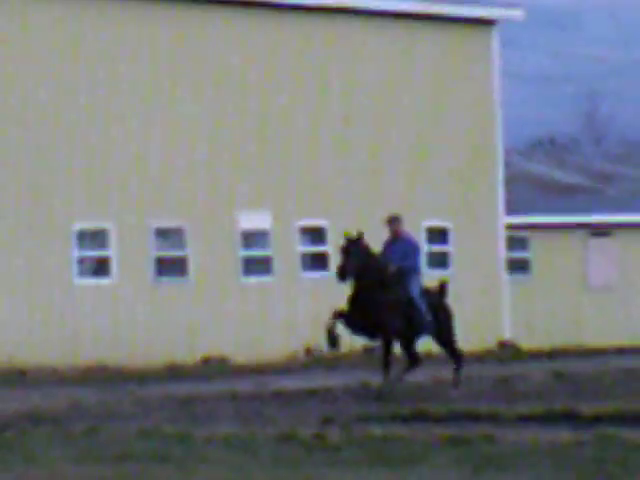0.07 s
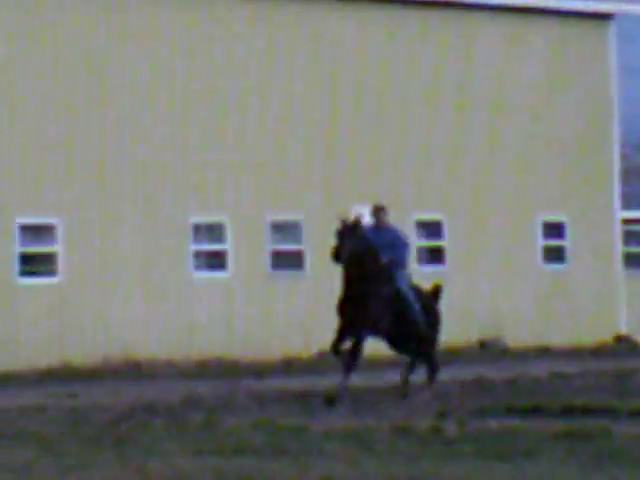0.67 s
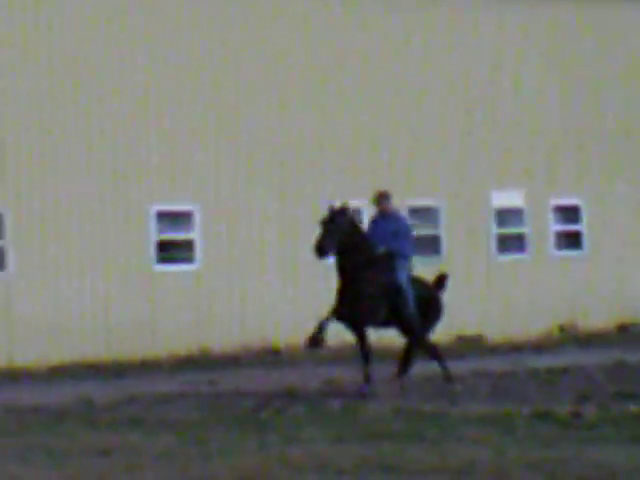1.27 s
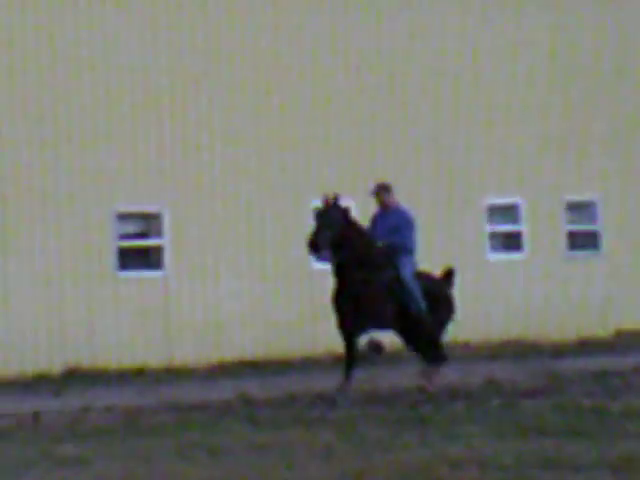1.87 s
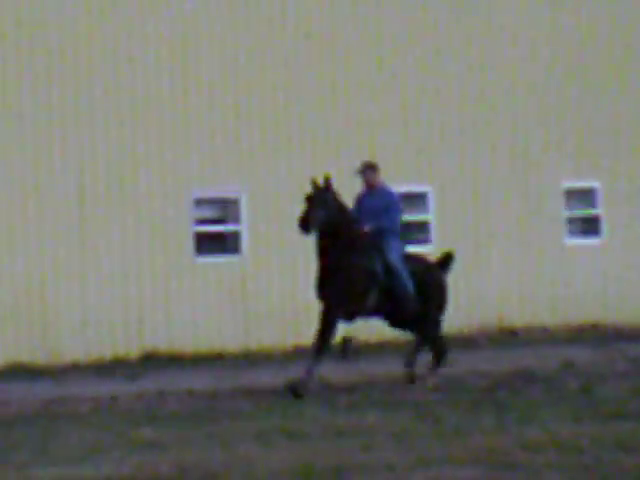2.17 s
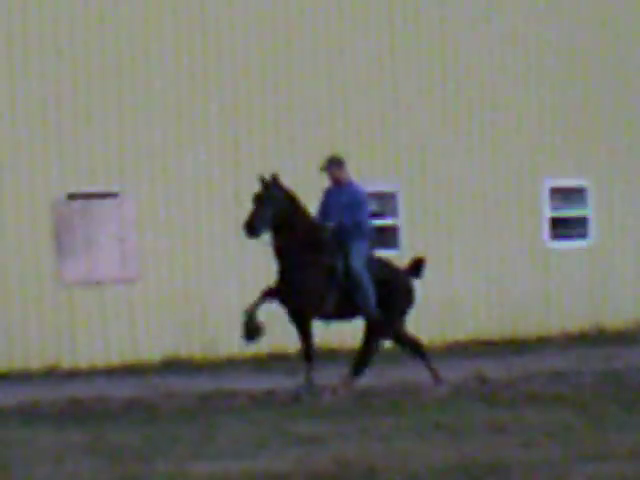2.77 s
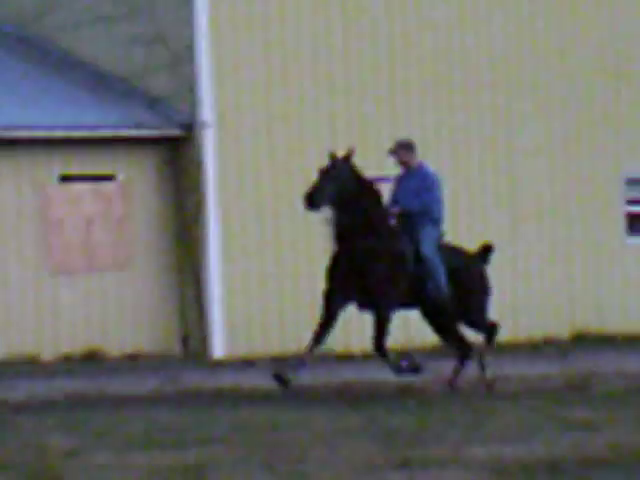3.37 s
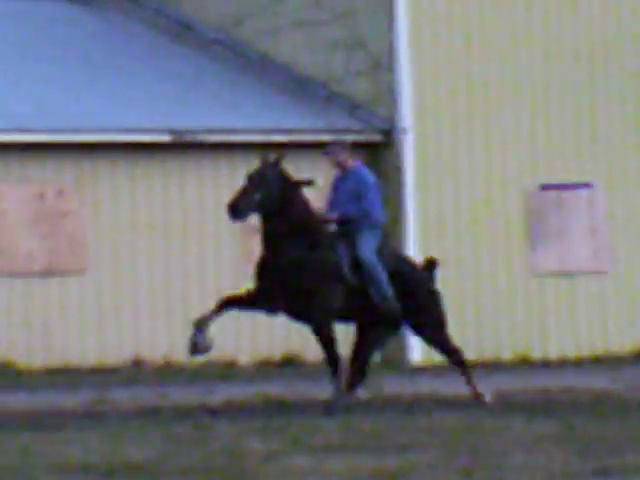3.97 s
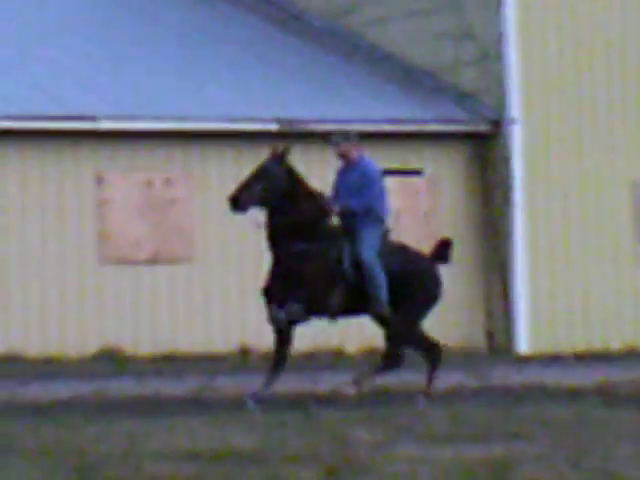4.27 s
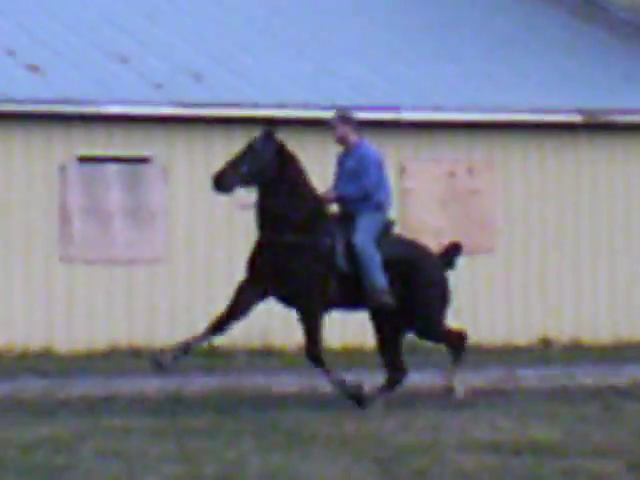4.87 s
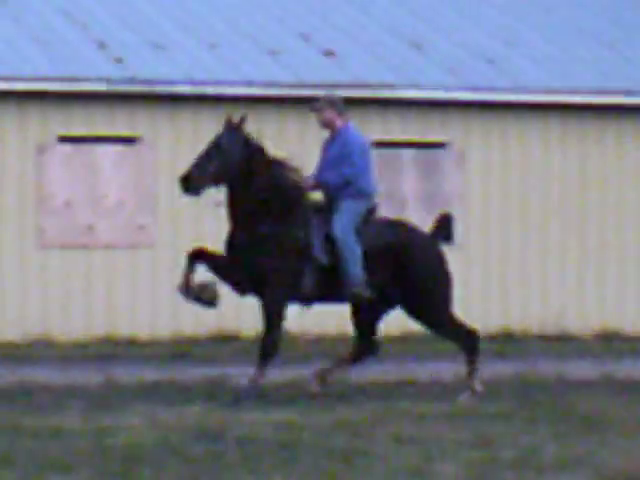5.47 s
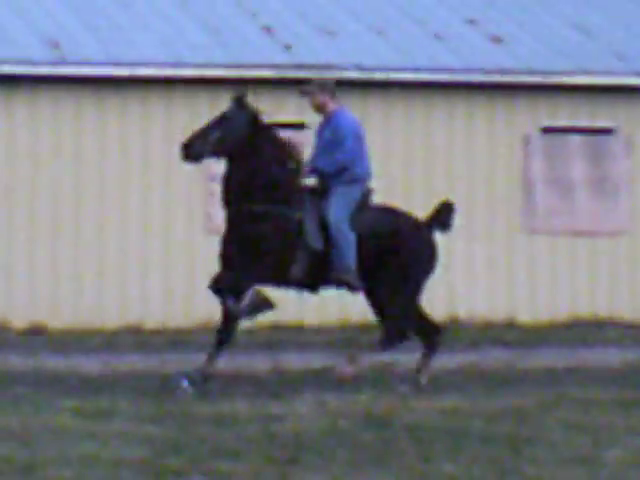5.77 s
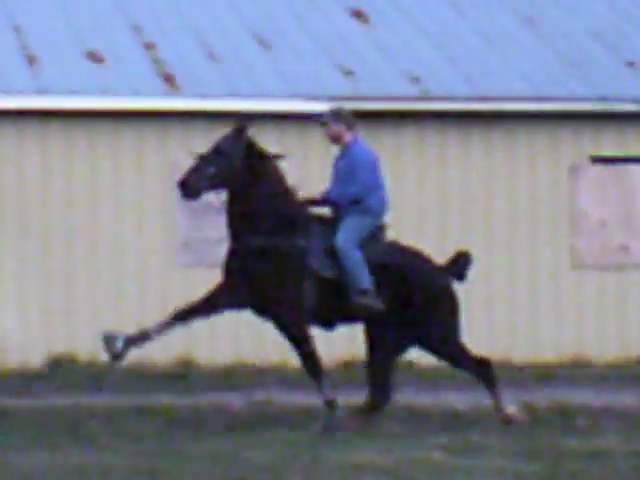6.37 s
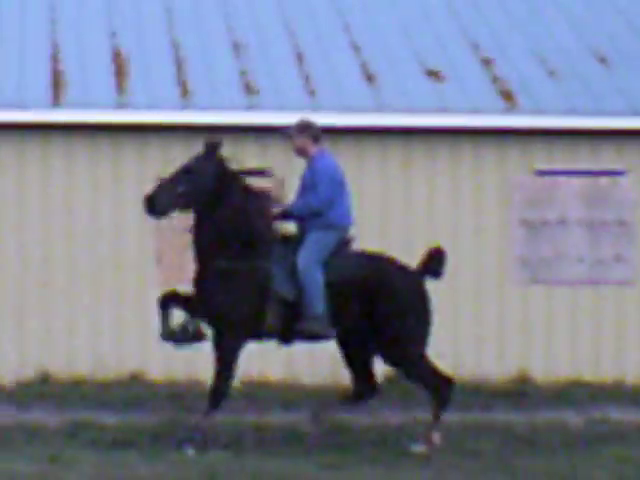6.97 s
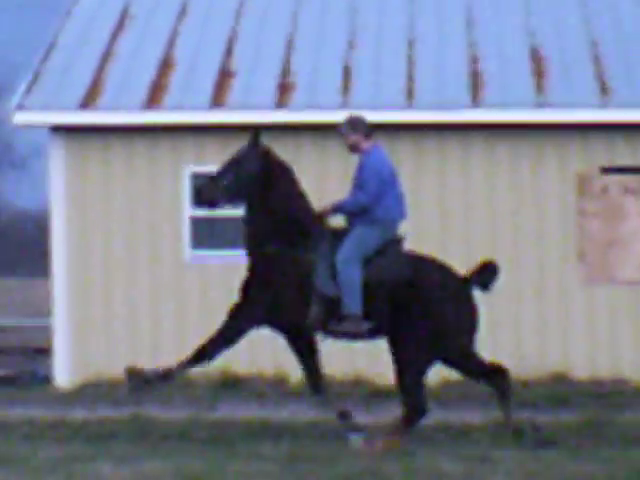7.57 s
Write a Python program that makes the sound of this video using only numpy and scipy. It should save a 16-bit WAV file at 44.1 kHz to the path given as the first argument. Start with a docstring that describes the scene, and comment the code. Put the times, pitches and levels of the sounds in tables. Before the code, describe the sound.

Gusty wind rumbles on the microphone over a steady hiss, with faint, gritty hoof ticks from a horse trotting some way off.

```python
"""First comes the hiss of a small camera; half a second in, its microphone wakes with a soft pop.
Wind is closest and loudest: gusts rumble on the diaphragm, flutter in the port and rush over the housing.
Some way off, a horse trots along a dirt track beside a barn, crushing grit and shaking its steel tack
in faint ticks. Far behind lie a band of noise like tyres on a road and the hush of open country."""
import sys
import numpy as np
from scipy.fft import rfft, irfft, next_fast_len
from scipy.io import wavfile
from scipy.ndimage import uniform_filter1d, map_coordinates

SR = 44100
rng = np.random.default_rng(int(sys.argv[2]) if len(sys.argv) > 2 else 0)


def wav_record(signal):
    """Record a signal, one row per channel, as 16-bit PCM in the file named by sys.argv[1]."""
    frames = np.transpose(np.atleast_2d(signal))
    bounded = np.clip(frames, -1, 1)
    # unit amplitude maps onto the largest positive 16-bit level
    quanta = np.round(bounded * 32767).astype(np.int16)
    wavfile.write(sys.argv[1], SR, quanta)


N = 336042
TIME = np.arange(N) / SR
AMPLIFIER_ON_S, MICROPHONE_ON_S = 0.036, 0.536

# Gusts at the microphone. Each row: start of the hold in seconds, hold in seconds,
# push on the diaphragm in dB, flutter in the port in dB.
GUSTS = [(.79, 0.031, -62, -69), (1.158, 0.027, -48, -58.5), (1.31, .18, -46, -49),
         (1.583, 0.15, -50, -48.5), (1.88, 0.18, -52.5, -52.5), (2.195, 0.085, -44, -50),
         (2.553, 0.18, -50.5, -61.5), (3.863, .02, -43, -53), (4.07, 0.27, -45.5, -48),
         (4.525, 0.38, -44, -49), (5.11, 0.37, -51, -49), (5.59, 0.041, -44, -47.5),
         (5.787, 0.079, -54, -52.5), (6.146, 0.17, -39.5, -53), (6.28, 0.024, -38, -70),
         (6.597, .09, -39, -48.5), (6.874, 0.42, -37.5, -51.5), (7.57, .05, -50, -60)]
# Air over the housing. Each row: start of the hold in seconds, hold in seconds, level in dB.
HOUSING_RUSHES = [(6.13, 0.24, -52), (6.68, 0.63, -55), (6.95, 0.054, -55)]
# Hoof strikes and scuffs on the track, about 2.6 steps a second. Each row: start in seconds,
# level in dB, length in seconds, steel ring against the grit in dB before a common lift.
HOOF_STRIKES = [(1.865, -61, .015, -8), (3.034, -55, 0.015, -10), (3.11, -66, .018, 3),
                (3.38, -62, 0.048, -3), (3.45, -64, 0.016, -1), (3.79, -65, .04, 2), (4.175, -61, .03, -7),
                (4.557, -55, 0.0091, -3), (4.591, -54.5, .014, 1), (4.636, -60.5, 0.018, 5),
                (4.968, -63, 0.043, 3), (5.361, -58, .035, -5), (5.772, -57.5, 0.017, -2),
                (5.82, -65, 0.022, -3), (6.231, -59.5, 0.026, -0.5), (6.494, -58, 0.033, -5),
                (6.85, -62, 0.044, -2), (6.92, -61, 0.015, -4), (6.944, -54, 0.0099, -9),
                (7.313, -61, .02, -3)]
# Small steel parts of the tack. Each row: resonance in Hz, width in Hz, relative level in dB.
TACK_RESONANCES = [(5370, 200, -5), (6090, 110, -0.5), (6960, 160, 0), (8870, 200, -3), (10560, 200, -3)]
# Thin tones in the camera's electronics. Each row: frequency in Hz, rms level in dB.
WHINE_TONES = [(4800, -84.5), (5600, -102), (6100, -82), (6200, -85), (7000, -85), (7400, -84)]
# The far road. Each row: time in seconds, level in dB, centre of the band in Hz.
ROAD_DRIFT = [(.54, -66, 770), (1.0, -68, 800), (2.05, -57.5, 800), (2.5, -61, 790), (2.9, -58.5, 760),
              (3.2, -59.5, 840), (3.5, -68.5, 860), (4.2, -61, 950), (7.6, -74.5, 830)]
# The converter's treble roll-off. Each row: frequency in Hz, gain in dB.
CONVERTER_ROLL_OFF = [(9500, 0.5), (10200, -2), (10800, -7.5), (11400, -13), (11900, -23), (12250, -31)]

# Noise spectra. Each row: frequency in Hz, relative spectral density in dB.
SURGE_SPECTRUM = [(2, -14), (8, 13), (15, -1.5), (23, -12), (34, -14), (50, -18), (100, -37), (400, -120)]  # deepest swings of the diaphragm
BUFFET_SPECTRUM = [(12, 10), (30, 5), (50, 5.5), (80, 2), (125, -7.5), (220, -19), (400, -57), (900, -63),
                   (3000, -120)]  # big eddies on the diaphragm
COARSE_EDDY_SPECTRUM = [(10, -39), (40, -27), (100, 1.5), (170, 1), (260, -5), (360, -10), (480, -15.5),
                        (800, -28), (3000, -78)]  # small eddies in the port
FINE_EDDY_SPECTRUM = [(60, -59), (200, 6.5), (340, 7.5), (480, 2.5), (620, 0.5), (800, 1), (1080, -3),
                      (1450, -12.5), (1950, -8.5), (2600, -21), (5000, -47), (12000, -73)]  # the finer ones in faster air
RUSH_SPECTRUM = [(200, 2.5), (500, -0.5), (800, 0), (1150, 3), (1550, -3), (1950, -1), (2250, -6),
                 (2600, -14), (4000, -22), (9000, -52)]  # air over the housing
GRIT_SPECTRUM = [(1000, -24), (3000, 4.5), (5000, 5), (6600, 5), (8000, -3), (10000, 2.5), (12000, -14)]  # grains under a hoof
HISS_SPECTRUM = [(30, 1), (300, -0.041), (1500, -0.54), (3200, -0.58), (4700, 0.39), (7500, -1.4),
                 (9300, -0.092), (12000, 0.83)]  # the camera's amplifier
HUSH_SPECTRUM = [(100, -19.5), (340, -11), (650, 12), (1050, 10), (1450, 3), (1950, 5),
                 (2800, -1), (5000, 0.5), (9000, 0.5), (12000, -20)]  # open country


def diaphragm_buffeting(surge_growth=0.97):
    """Big eddies push the diaphragm; the deepest swings follow the wind sluggishly."""
    pushes = [(start, hold, push) for start, hold, push, _ in GUSTS]
    push_db = gust_level(pushes, breeze_db=-52.5, attack_s=0.1, release_s=0.21)
    sluggish_db = uniform_filter1d(push_db, size=SR // 4)
    surge_db = -35 + surge_growth * (sluggish_db + 46.5)
    surge = amp(surge_db) * turbulence(SURGE_SPECTRUM, burst_db=0.5, burst_rate=26)
    rumble = amp(push_db) * turbulence(BUFFET_SPECTRUM, burst_db=1.2, burst_rate=19)
    return surge + rumble


def port_flutter(fine_growth=1.44):
    """Small eddies flutter in the microphone port; faster air breaks them into finer, brighter ones."""
    flows = [(start, hold, flow) for start, hold, _, flow in GUSTS]
    flow_db = gust_level(flows, breeze_db=-66, attack_s=0.091, release_s=0.17)
    fine_db = -53 + fine_growth * (flow_db + 47.5)
    coarse = amp(flow_db) * turbulence(COARSE_EDDY_SPECTRUM, burst_db=1.0, burst_rate=70)
    fine = amp(fine_db) * turbulence(FINE_EDDY_SPECTRUM, burst_db=3.5, burst_rate=80)
    puffs = unit(amp(1.44 * wobble(35)))
    return puffs * (coarse + fine)


def housing_rush():
    """The strongest gusts rush over the camera housing; in lighter wind it is silent."""
    rush_db = gust_level(HOUSING_RUSHES, breeze_db=-np.inf, attack_s=0.082, release_s=0.18)
    return amp(rush_db) * turbulence(RUSH_SPECTRUM, burst_db=3.0, burst_rate=70)


def hooves(attack_s=0.001, grains_per_s=3000, ring_lift_db=3.0):
    """Some way off, each stride crushes tiny grains out of the track and shakes the steel of the tack."""
    crush, shake = np.zeros(N), np.zeros(N)
    for start, db, length, ring_db in HOOF_STRIKES:
        age = np.maximum(TIME - start, 0)
        blow = amp(db) * (1 - np.exp(-age / attack_s)) * np.exp(-(age / length) ** 2)
        crush += blow
        shake += blow * amp(ring_db)
    contacts = lambda: rng.standard_normal(N) * (rng.random(N) < grains_per_s / SR)
    steel = lambda hz: sum(amp(db) * 1j * hz * width / (centre ** 2 - hz ** 2 + 1j * hz * width)
                           for centre, width, db in TACK_RESONANCES)
    grit = crush * coloured(contacts(), GRIT_SPECTRUM)
    ring = shake * unit(filtered(contacts(), steel))
    return grit + amp(ring_lift_db) * ring


def switch_on_pop(start, db, settle_s=1.0):
    """A voltage step in the camera leaks away through the coupling capacitor."""
    return amp(db) * (TIME >= start) * np.exp(-np.abs(TIME - start) / settle_s)


def camera_electronics():
    """The amplifier hisses steadily, with a few thin tones in it."""
    hiss = amp(-55.5) * coloured(rng.standard_normal(N), HISS_SPECTRUM)
    whine = sum(amp(db) * np.sqrt(2) * np.sin(2 * np.pi * (hz * TIME + rng.random()))
                for hz, db in WHINE_TONES)
    return hiss + whine


def far_road(half_width_hz=195, skirt=1.18):
    """Distance leaves one soft band of tyre noise that swells and drifts."""
    level_db, centre_hz = curves(ROAD_DRIFT)
    low_pass = lambda hz: (1 + (hz / half_width_hz) ** 2) ** -skirt
    low_noise = lambda: unit(filtered(rng.standard_normal(N), low_pass))
    phase = 2 * np.pi * np.cumsum(centre_hz) / SR
    band = low_noise() * np.cos(phase) + low_noise() * np.sin(phase)
    return amp(level_db) * unit(band)


def country_air():
    """The faint, even hush of open country lies behind everything."""
    return amp(-63) * coloured(rng.standard_normal(N), HUSH_SPECTRUM)


def gust_level(rows, breeze_db, attack_s, release_s):
    """Level in dB of a breeze plus gusts; each one swells, holds and dies away."""
    power = np.full(N, amp(breeze_db) ** 2)
    for start, hold, db in rows:
        before, after = np.maximum(start - TIME, 0), np.maximum(TIME - start - hold, 0)
        power += (amp(db) * np.exp(-before / attack_s - after / release_s)) ** 2
    return 10 * np.log10(power)


def turbulence(spectrum, burst_db, burst_rate):
    """Noise that comes in short random bursts as eddies pass; no burst grows without bound."""
    bursts = 2 * np.tanh(wobble(burst_rate) / 2)
    return coloured(rng.standard_normal(N) * amp(burst_db * bursts), spectrum)


def amp(db):
    """Decibels to gain."""
    return 10 ** (np.asarray(db) / 20)


def unit(x):
    """Scale to rms 1."""
    return x / np.sqrt(np.mean(x ** 2) + 1e-20)


def along(points, hz):
    """Read (Hz, value) points on a log frequency axis."""
    frequencies, values = np.transpose(points)
    return np.interp(np.log(hz + 1), np.log(frequencies + 1), values)


def curves(rows):
    """One value per sample for each column after the time."""
    times, *columns = np.transpose(rows)
    return [np.interp(TIME, times, column) for column in columns]


def wobble(rate):
    """A smooth random curve, rate knots a second."""
    knots = rng.standard_normal(int(N * rate / SR) + 4)
    return map_coordinates(knots, [TIME * rate])


def filtered(x, response):
    """Pass x through a frequency response."""
    size = next_fast_len(N + SR // 2)
    hz = np.fft.rfftfreq(size, 1 / SR)
    return irfft(rfft(x, size) * response(hz), size)[:N]


def coloured(x, spectrum):
    """Shape x by a spectrum, at rms 1."""
    return unit(filtered(x, lambda hz: amp(along(spectrum, hz))))


def scene():
    """The amplifier wakes first, then the microphone lets the outdoors in."""
    awake = np.clip((TIME - MICROPHONE_ON_S) / 0.01, 0, 1)
    wind = diaphragm_buffeting() + port_flutter() + housing_rush()
    outdoors = wind + far_road() + country_air() + hooves()
    self_noise = camera_electronics() * (TIME >= AMPLIFIER_ON_S)
    pops = switch_on_pop(MICROPHONE_ON_S, db=-33) - switch_on_pop(AMPLIFIER_ON_S, db=-42)
    return (awake * outdoors + self_noise + pops)[None]


def record(dry):
    """The camera's one channel rolls off the top treble and keeps nothing above its band limit."""
    band_limit_hz = 12300
    converter = lambda hz: amp(along(CONVERTER_ROLL_OFF, hz)) * (hz < band_limit_hz)
    return filtered(dry[0], converter)[None]


dry = scene()
out = record(dry)
wav_record(out)
```